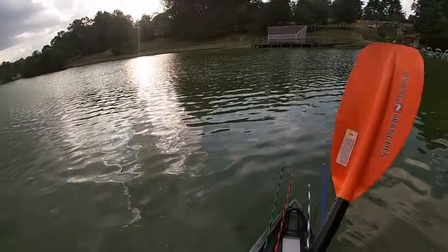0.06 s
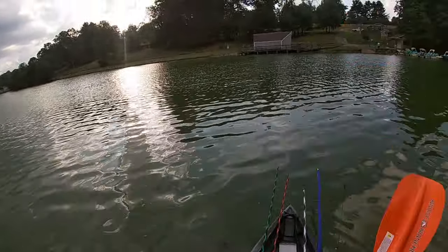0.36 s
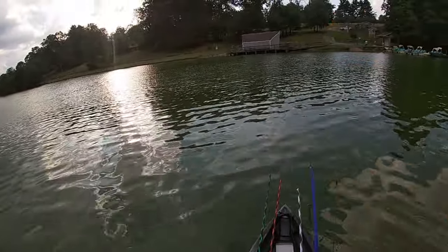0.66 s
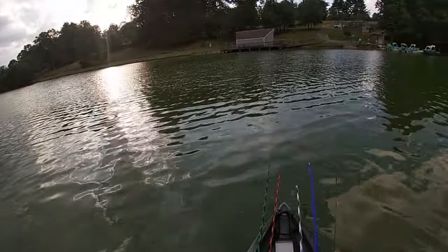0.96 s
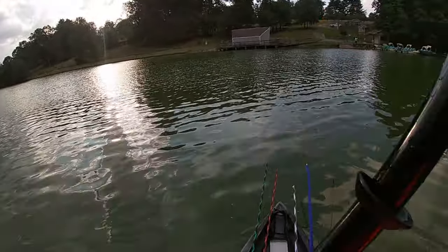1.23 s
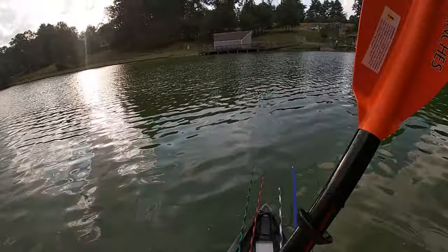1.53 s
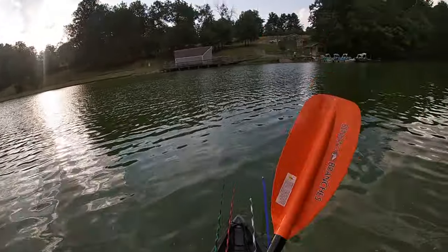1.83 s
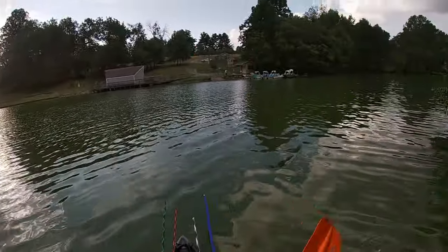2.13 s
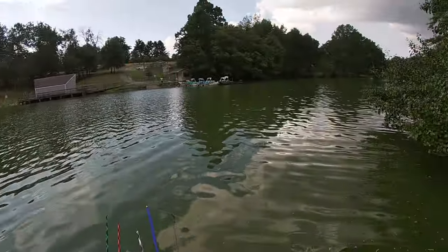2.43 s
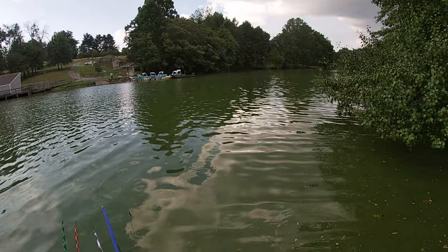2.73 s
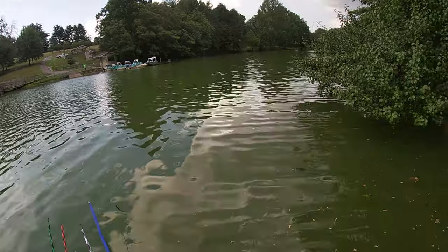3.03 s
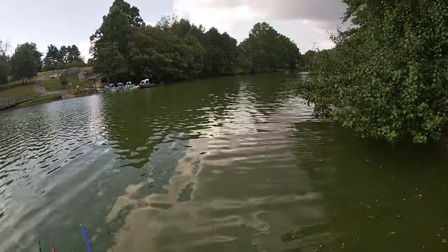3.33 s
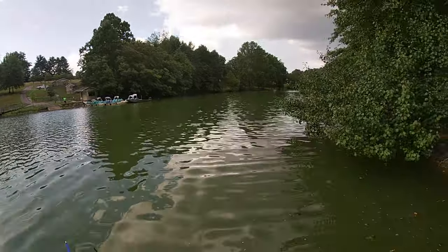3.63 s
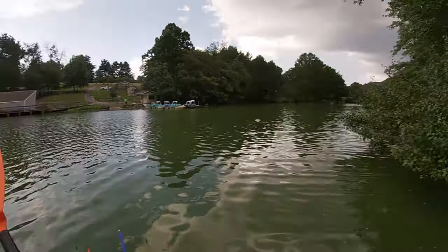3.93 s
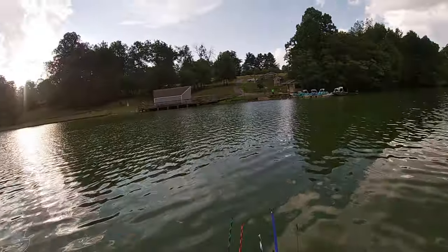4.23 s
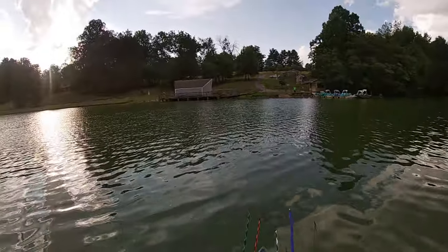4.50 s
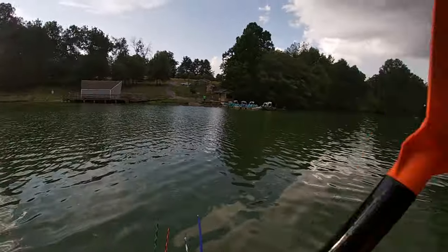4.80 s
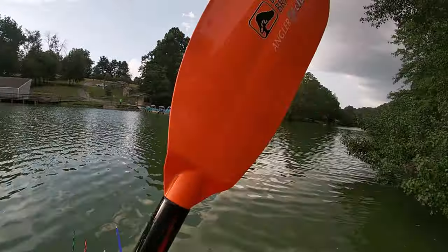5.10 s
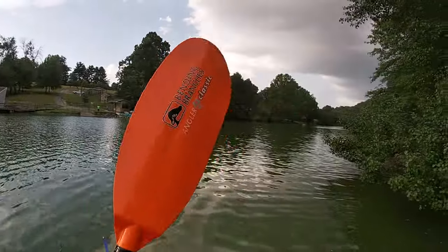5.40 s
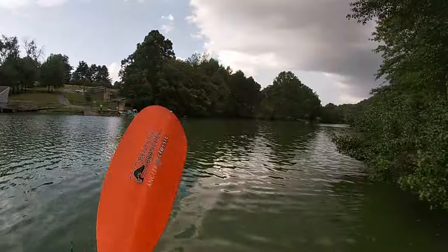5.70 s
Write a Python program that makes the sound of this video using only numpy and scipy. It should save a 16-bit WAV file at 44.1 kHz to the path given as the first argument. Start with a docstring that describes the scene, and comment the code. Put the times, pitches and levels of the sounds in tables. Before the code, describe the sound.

A kayak paddle dips, gurgles and drips in uneven strokes on a pond, with wind rumbling on the microphone.

```python
"""On a pond, close to a kayak paddled in uneven strokes: each blade plops in, churns up ringing
bubbles and drips as it is lifted. Wind buffets the microphone, which hears everything twice,
a few milliseconds apart, and so sounds hollow. Farther off, on the wooded bank, crickets trill
with their wings and small birds chip now and then over a hiss of leaves and insects."""
import sys
import numpy as np
from scipy import signal
from scipy.fft import rfft, irfft
from scipy.io import wavfile
from scipy.ndimage import uniform_filter1d

SR = 44100
rng = np.random.default_rng(int(sys.argv[2]) if len(sys.argv) > 2 else 0)


def unload_wav(signal):
    """Save mono or channel-first audio to the path in sys.argv[1] as 16-bit WAV at rate SR, clipped to [-1, 1]."""
    wavfile.write(
        sys.argv[1],
        SR,
        np.round(np.clip(np.atleast_2d(signal).T, -1, 1) * 32767).astype(np.int16),
    )


N = 262395
TIME = np.arange(N) / SR


# Pulls of the blade, close by: catch_s, attack_s, length_s, gurgle_db, slosh_db, spray_db
STROKES = [(0.0, 0.03, 0.38, -48.5, -52, -84), (0.489, 0.36, 0.2, -52.5, -50, -60),
           (2.052, 0.23, 0.25, -50, -47.5, -60.5), (3.663, 0.079, 0.074, -48, -46, -54),
           (3.879, 0.045, 0.079, -43.5, -45, -58), (4.105, 0.12, 0.032, -45, -53.5, -65),
           (5.796, 0.15, 0.17, -50.5, -55.5, -79.5)]

def stirring(levels_db, bed, lag_s, sag_db_per_s, release_db_per_s):
    """Bubble level in dB over a quiet bed: up at each catch, easing in the pull, settling after it."""
    power = bed ** 2
    for (catch_s, attack_s, length_s, *_), level_db in zip(STROKES, levels_db):
        t = TIME - catch_s - lag_s
        fall_db = sag_db_per_s * np.clip(t, 0, length_s) + release_db_per_s * np.maximum(t - length_s, 0)
        power += (ramp(catch_s + lag_s - attack_s, attack_s) * from_db(level_db - fall_db)) ** 2
    return 10 * np.log10(power)


# Large, middling and fine bubbles around the blade: pitch_hz, relative_db
GURGLE = [(125, 5), (180, -3.5), (260, -12.5), (380, 4), (520, -24)]
SLOSH = [(400, -16), (550, -5), (1000, -3.5), (1500, -2.5), (2200, -5.5), (3000, -7.5), (4000, -9.5)]
SPRAY = [(2800, 4), (4000, 0.5), (6000, 3), (8500, 0), (10000, -5.5), (11000, -21.5), (14000, -14)]

def churn(runoff_fade_s=0.27, clump_db=1.56):
    """The blade folds air into the water; between pulls, ripples lap the hull and the blade trickles."""
    *_, gurgles, sloshes, sprays = np.transpose(STROKES)
    lap = from_db(in_time(BACKGROUND_LEVEL))
    trickle = np.zeros(N)
    for start_s, length_s, trickle_db, _ in RUNOFFS:
        fade_in = ramp(start_s - runoff_fade_s, runoff_fade_s)
        fade_out = 1 - ramp(start_s + length_s, runoff_fade_s)
        trickle += from_db(trickle_db) * fade_in * fade_out
    gurgle_bed = np.hypot(from_db(-64.5) * lap, from_db(-6.5) * trickle)
    slosh_bed = np.hypot(from_db(-69) * lap, trickle)
    spray_bed = np.hypot(from_db(-77) * lap, from_db(-13) * trickle)
    gurgle_db = stirring(gurgles, gurgle_bed, lag_s=0.005, sag_db_per_s=1.3, release_db_per_s=89)
    slosh_db = stirring(sloshes, slosh_bed, lag_s=0.0013, sag_db_per_s=16.4, release_db_per_s=79)
    spray_db = stirring(sprays, spray_bed, lag_s=0.0034, sag_db_per_s=26.3, release_db_per_s=49)
    clumps_db = clump_db * wander(width_hz=27.2)   # tumbling water bunches the slosh and spray
    gurgle = bubble_cloud(GURGLE, gurgle_db, max_per_s=170, ring_cycles=17.8,
                          spread_db=2.5, rise=0.542, froth=0.37, thinning=0.18)
    slosh = bubble_cloud(SLOSH, slosh_db + clumps_db, max_per_s=1200, ring_cycles=28.1,
                         spread_db=2.5, rise=0.33, froth=0.63, thinning=0.26)
    spray = bubble_cloud(SPRAY, spray_db + clumps_db, max_per_s=3000, ring_cycles=28,
                         spread_db=6.5, rise=0.053, froth=1.0, thinning=0.19)
    return gurgle + slosh + spray


def bubble_cloud(sizes, level_db, max_per_s, ring_cycles, spread_db, rise, froth, thinning):
    """Random bubbles on a bed of fine froth; they come thicker as the water is stirred harder."""
    bubbles = np.zeros(N)
    low_hz, high_hz = sizes[0][0], min(sizes[-1][0], .4 * SR)
    density = from_db(thinning * (level_db - level_db.max()))
    for when, size, strength, life, side, luck in rng.random((int(max_per_s * N / SR), 6)):
        chance = density[int(when * N)]
        if luck < chance:
            hz = low_hz * (high_hz / low_hz) ** size
            gain = from_db(at_hz(sizes, hz) - spread_db * np.log(max(strength, .03))) / np.sqrt(chance)
            ring = bubble(hz, ring_cycles * (.5 + life) / hz, rise * 2 * life, onset_cycles=0.76)
            add(bubbles, when * N / SR, np.sign(side - .5) * gain * ring)
    fizz_spectrum = [(hz, db - 10 * np.log10(hz)) for hz, db in sizes]
    fizz = band(noise(fizz_spectrum), low_hz, high_hz, order=3)
    return from_db(level_db) * steady(rms_one(bubbles) + froth * rms_one(fizz), span_s=0.023)


def bubble(hz, t60_s, rise, onset_cycles, bend=None):
    """A trapped air pocket rings, rising in pitch as it nears the surface and bent by moving water."""
    t = np.arange(int(t60_s * SR) + 2) / SR
    onset = 1 - np.exp(-(t * hz / onset_cycles) ** 2)
    envelope = onset * from_db(-60 * t / t60_s)
    sway_s = 0 if bend is None else np.cumsum(np.resize(bend, len(t))) / SR
    cycles = hz * (t * (1 + rise * t / t60_s / 2) + sway_s)
    return envelope / (envelope.max() + 1e-12) * np.sin(2 * np.pi * cycles)


# The larger plops and drips beside the boat: start_s, pitch_hz, peak_db, t60_s
PLOPS = [(0.0148, 465, -30, 0.0077), (0.087, 1540, -44.5, 0.025), (0.3863, 570, -36, 0.021),
         (0.401, 1364, -37, 0.031), (0.67, 1075, -41.5, 0.024), (0.777, 730, -47.5, 0.04),
         (1.2157, 690, -45.5, 0.011), (1.217, 1850, -49, 0.019), (1.3001, 475, -31.5, 0.018),
         (1.437, 790, -57, 0.035), (1.4766, 530, -37, 0.023), (1.506, 990, -42, 0.023),
         (1.507, 1630, -43, 0.02), (1.537, 1110, -41.5, 0.026), (1.5587, 1810, -44.5, 0.022),
         (1.606, 517, -42.5, 0.017), (1.6168, 1020, -39, 0.019), (1.644, 297, -46, 0.13),
         (1.676, 2080, -54, 0.028), (1.697, 1250, -43, 0.022), (1.705, 404, -38, 0.28),
         (1.777, 1117, -37, 0.047), (1.806, 2040, -45, 0.041), (1.824, 3150, -49.5, 0.076),
         (1.867, 420, -39.5, 0.11), (1.9532, 2030, -44.5, 0.023), (1.96, 2850, -45.5, 0.031),
         (2.0436, 950, -34.5, 0.031), (2.067, 824, -34, 0.029), (2.094, 750, -39.5, 0.035),
         (2.1245, 740, -35.5, 0.075), (2.28, 970, -40.5, 0.041), (3.585, 990, -44.5, 0.022),
         (3.616, 1040, -45, 0.023), (3.6303, 1070, -20.5, 0.012), (3.6321, 2050, -28, 0.016),
         (3.6884, 1140, -27.5, 0.014), (3.743, 373, -34.5, 0.14), (3.775, 249, -40, 0.022),
         (3.7815, 1025, -32, 0.023), (3.824, 2590, -35.5, 0.022), (3.825, 790, -40.5, 0.017),
         (3.8865, 2340, -37, 0.015), (3.9304, 768, -35, 0.042), (4.016, 1070, -38, 0.025),
         (4.017, 568, -33.5, 0.025), (4.04, 1060, -43, 0.022), (4.466, 1080, -56.5, 0.017),
         (4.558, 264, -50, 0.054), (4.744, 1340, -55.5, 0.038), (4.988, 2250, -56, 0.025),
         (5.044, 1750, -53, 0.0089), (5.071, 1030, -51, 0.022), (5.125, 1850, -63, 0.018),
         (5.21, 1340, -54, 0.012), (5.233, 1580, -55, 0.014), (5.2807, 515, -42, 0.041),
         (5.305, 2090, -63, 0.028), (5.371, 2080, -55.5, 0.028), (5.3858, 1670, -51, 0.024),
         (5.454, 1880, -54, 0.022), (5.498, 1850, -61, 0.017), (5.523, 3950, -60, 0.022),
         (5.609, 2150, -58, 0.026), (5.613, 730, -65, 0.03), (5.6653, 824, -47, 0.024),
         (5.667, 2000, -52.5, 0.022), (5.697, 450, -36.5, 0.023), (5.707, 1090, -41.5, 0.025),
         (5.798, 990, -47, 0.024), (5.8757, 1530, -43.5, 0.025)]

def plops(splash_db=-9, wobble=0.056, shed_count=3, shed_db=-12, shed_s=0.033, shed_octaves=0.73):
    """A heavy drop or fold of water breaks the surface; its bubble wavers and sheds a few fainter ones."""
    out = np.zeros(N)
    unrest = wobble * wander(width_hz=250)
    for (start_s, hz, peak_db, t60_s), shed in zip(PLOPS, rng.random((len(PLOPS), shed_count, 2))):
        ring = bubble(hz, t60_s, rise=0.051, onset_cycles=0.36, bend=unrest[int(start_s * SR):])
        add(out, start_s, from_db(peak_db) * ring)
        add(out, start_s, from_db(peak_db + splash_db) * crack(1.54 * hz, t60_s=0.0046))
        for when, size in shed:
            shed_hz = hz * 2 ** (shed_octaves * (2 * size - .7))
            ring = bubble(shed_hz, t60_s / 2, rise=0.07, onset_cycles=0.43)
            add(out, start_s + when * shed_s, from_db(peak_db + shed_db) * (1 - when / 2) * ring)
    return out


# Air hollows beside the blade: start_s, length_s, start_hz, end_hz, level_db, roughness (0-1)
GULPS = [(1.343, 0.028, 945, 1510, -58, 0.2), (1.374, 0.028, 450, 573, -54, 0.4),
         (1.941, 0.075, 253, 269, -39, 0.46), (2.0377, 0.027, 250, 620, -23, 0.33),
         (2.107, 0.012, 1770, 3150, -40, 0.6), (2.277, 0.0237, 526, 885, -36.5, 0.76),
         (4.83, 0.027, 435, 850, -52, 0.42), (4.881, 0.06, 1575, 1700, -68.5, 0.3),
         (5.064, 0.05, 266, 335, -52.5, 0.37), (5.16, 0.13, 803, 758, -61.5, 0.9),
         (5.41, 0.12, 494.6, 540, -52, 0.87), (5.664, 0.0416, 401, 650, -45, 0.25),
         (5.705, 0.023, 830, 960, -48, 0.4), (5.706, 0.056, 368, 458, -38, 0.23),
         (5.757, 0.068, 447, 638, -43, 0.54), (5.803, 0.15, 511, 570, -43.5, 0.92),
         (5.839, 0.04, 774, 1560, -49, 0.6)]

def gulps():
    """The hollow behind a pulled blade rings, gliding as it changes size; tumbling water roughens it."""
    out = np.zeros(N)
    tumble = flutter(width_hz=208)
    for start_s, length_s, start_hz, end_hz, level_db, roughness in GULPS:
        progress = np.linspace(0, 1, int(length_s * SR))
        hz = start_hz * (end_hz / start_hz) ** (progress ** 1.86)
        envelope = np.sqrt(np.abs(np.sin(np.pi * progress ** 0.94))) * (1 - progress / 2)
        unrest = np.roll(tumble, -int(start_s * SR))[:len(progress)]
        drive = np.sqrt(1 - roughness ** 2) + roughness * unrest
        add(out, start_s, from_db(level_db) * envelope * np.imag(drive * phasor(hz)))
    return out


# Slaps on the water, close by: start_s, peak_db, band_hz
SLAPS = [(0.022, -39, 4400), (0.359, -38, 2070), (0.851, -48, 1490), (1.3, -38.5, 5050), (1.301, -56, 900),
         (1.302, -36.5, 1800), (1.463, -38.5, 1650), (1.475, -40.5, 2060), (1.774, -37.5, 815),
         (1.936, -40.5, 1100), (2.111, -33, 2480), (2.278, -47, 890), (3.558, -52, 4000),
         (3.574, -52, 5500), (3.6278, -32.5, 6240), (3.6305, -35, 810), (3.6312, -29.5, 1670),
         (3.781, -38, 4200), (3.782, -35.5, 1100), (3.824, -39, 1350), (3.876, -38.5, 880),
         (3.877, -48, 1800), (4.017, -34.5, 705), (4.129, -46, 5100), (4.159, -41, 1860),
         (5.442, -45.5, 2800), (5.51, -51.5, 4400)]

def slaps():
    """The blade or a drop hits the surface with a brief crack."""
    out = np.zeros(N)
    for start_s, peak_db, band_hz in SLAPS:
        add(out, start_s, from_db(peak_db) * crack(band_hz, t60_s=0.0077))
    return out


def crack(band_hz, t60_s):
    """The surface breaks in a burst of noise about an octave wide that dies at once; peak 1."""
    t = np.arange(N // 40) / SR
    burst = from_db(-60 * t / t60_s) * rng.standard_normal(len(t))
    burst = band(burst, band_hz / 1.53, band_hz * 1.17)
    return burst / np.abs(burst).max()


# Water running off the raised blade: start_s, length_s, trickle_db, loudest_drip_db
RUNOFFS = [(1.423, 0.53, -57.5, -44.5), (4.868, 0.8, -74, -59)]

def drips(per_s=82, range_db=13, low_hz=515, high_hz=2990):
    """Small drops fall at random while the blade is in the air, each ringing a bubble."""
    out = np.zeros(N)
    for start_s, length_s, _, loudest_db in RUNOFFS:
        for when, size, softness in rng.random((int(per_s * length_s), 3)):
            ring = bubble(low_hz * (high_hz / low_hz) ** size, t60_s=0.019, rise=0.28, onset_cycles=0.77)
            add(out, start_s + when * length_s, from_db(loudest_db - range_db * softness) * ring)
    return out


# Spurts of droplets from the raised blade: start_s, length_s, level_db
SPURTS = [(1.07, 0.034, -48), (1.297, 0.02, -50), (1.326, 0.56, -63)]

def spatter(per_s=2500, fade_db=14, range_db=10):
    """Fine droplets fly off the wet blade in soft spurts that die away."""
    clicks = np.zeros(N)
    for start_s, length_s, level_db in SPURTS:
        for when, softness, side in rng.random((int(per_s * length_s), 3)):
            click = np.sign(side - .5) * from_db([level_db - fade_db * when - range_db * softness])
            add(clicks, start_s + when * length_s, click)
    return band(clicks, low_hz=5000, high_hz=14500)


# Hard ticks, close by: start_s, level_db, t60_s
TICKS = [(0.049, -44.5, 0.045), (0.851, -47, 0.023), (2.728, -55, 0.039), (2.7554, -46.5, 0.03),
         (2.773, -43.5, 0.025), (4.228, -32, 0.0077), (4.2435, -36.5, 0.011)]
# The rings of one tick: pitch_hz, relative_db
TICK_MODES = [(2720, -4), (3020, -4), (3900, -14.5), (5500, -22)]

def ticks():
    """A small hard part, likely a loose joint in the paddle, clicks with the same few short rings."""
    out = np.zeros(N)
    for start_s, level_db, t60_s in TICKS:
        for hz, mode_db in TICK_MODES:
            ring = bubble(hz, t60_s, rise=0.012, onset_cycles=2.1)
            add(out, start_s, from_db(level_db + mode_db) * ring)
    return out


# The breeze right on the microphone: time_s, level_db
BREEZE = [(0.0, -35.5), (0.23, -37.5), (0.48, -39.5), (0.68, -40.5), (0.93, -37.5), (1.11, -35),
          (1.49, -48), (1.66, -52.5), (1.89, -40), (2.07, -32.5), (2.15, -36), (2.88, -44.5), (3.71, -39),
          (3.96, -27), (4.32, -42.5), (4.54, -43), (5.65, -42.5), (5.95, -37.5)]
# Short lulls and a few slight lifts in it: centre_s, half_length_s, change_db
LULLS = [(0.578, 0.038, -10), (0.73, 0.035, 1.5), (1.19, 0.05, -9.5), (2.51, 0.05, -3), (2.623, 0.014, -13),
         (2.956, 0.031, -16), (3.085, 0.025, 0.5), (3.327, 0.029, -6), (4.004, 0.1, -13),
         (4.615, 0.083, -6), (4.885, 0.033, -0.5), (5.784, 0.05, -4)]
# Gusts on top of it: centre_s, half_length_s, rumble_db, buffet_db
GUSTS = [(0.14, 0.12, -66, -39), (0.271, 0.035, -40, -36.5), (0.356, 0.013, -34, -40.5),
         (0.63, 0.02, -37, -60), (0.886, 0.018, -32.5, -37), (0.973, 0.019, -30.5, -35.5),
         (1.051, 0.012, -29.5, -39), (1.11, 0.033, -44, -56), (1.552, 0.1, -39, -81),
         (1.982, 0.048, -39.5, -37), (2.097, 0.035, -41, -39), (2.236, 0.019, -29.5, -33),
         (2.377, 0.007, -32, -47), (2.639, 0.027, -42, -37.5), (2.792, 0.017, -31.5, -59),
         (3.265, 0.016, -39.5, -60), (3.433, 0.019, -33, -65), (3.55, 0.034, -35, -68),
         (3.793, 0.05, -33.5, -33.5), (4.119, 0.015, -41.5, -31), (4.164, 0.029, -29.5, -30.5),
         (4.38, 0.051, -37, -52.5), (4.528, 0.027, -40.5, -49), (5.22, 0.023, -35, -48.5),
         (5.437, 0.032, -42.5, -47), (5.555, 0.034, -34.5, -51), (5.639, 0.022, -37, -43.5)]
# Spectra of the deep rumble and the higher buffeting: frequency_hz, density_db
RUMBLE = [(12, -24), (25, 3.5), (38, 2), (55, 1.5), (80, -6.5), (120, -11), (180, -26.5), (280, -43.5),
          (500, -41.5), (1000, -85)]
BUFFETING = [(40, -16.5), (70, -2.5), (120, 2.5), (170, -7.5), (260, -17.5), (400, -33), (2000, -100)]

def wind(lumpy_db=2.0):
    """Eddies rumble on the microphone port in lumps; gusts swell briefly and buffet it higher in pitch."""
    breeze_db = in_time(BREEZE) + lumpy_db * wander(width_hz=22.4)
    breeze_db += sum(change_db * hump(centre_s, half_s) for centre_s, half_s, change_db in LULLS)
    rumble_gain, buffet_gain = from_db(breeze_db - 2), from_db(breeze_db - 18)
    for centre_s, half_s, rumble_db, buffet_db in GUSTS:
        swell = hump(centre_s, half_s)
        rumble_gain = np.hypot(rumble_gain, from_db(rumble_db) * swell)
        buffet_gain = np.hypot(buffet_gain, from_db(buffet_db) * swell)
    rumble = rumble_gain * steady(noise(RUMBLE), span_s=0.05)
    buffeting = buffet_gain * steady(noise(BUFFETING), span_s=0.029)
    return rumble + buffeting


# Two crickets across the water: pitch_hz, wing_strokes_per_s, one_stroke_at_s
CRICKETS = [(8225, 21.6, 2.693), (7760, 19.4, 5.36)]
# How strongly they sing, one curve each: time_s, level_db
SONGS = [
    [(0, -76), (1.6, -88), (2.4, -68), (2.5, -72), (2.68, -63.5), (2.87, -64.5), (3.12, -69), (3.4, -75),
     (3.55, -66), (4.3, -65), (4.42, -70), (4.72, -80), (4.79, -71), (4.92, -71), (5.23, -69), (5.3, -101)],
    [(2.0, -106), (2.5, -80), (4.3, -67), (4.65, -91), (5.3, -76), (5.95, -83)],
]

def crickets(waver=0.006, uneven_db=1.5, stagger_s=0.002, direct=0.48, scattered=0.25):
    """Each wing stroke is one short, unsteady note, a little early or late and blurred by the leaves."""
    out = np.zeros(N)
    for (pitch_hz, per_s, stroke_s), song in zip(CRICKETS, SONGS):
        late_s = stagger_s * wander(width_hz=9)
        strokes = np.maximum(np.cos(2 * np.pi * per_s * (TIME - stroke_s - late_s)), 0)
        hz = pitch_hz * (1 + waver * noise_band(5.5, 200))
        level_db = in_time(song) + uneven_db * wander(width_hz=12)
        paths = direct + scattered * flutter(width_hz=130)
        out += from_db(level_db) * strokes * np.imag(paths * phasor(hz))
    return out


# Chips from the trees: centre_s, half_length_s, pitch_hz, glide_hz_per_s, level_db, blur_hz
BIRD_CHIPS = [(2.888, 0.027, 8500, -3500, -69, 150), (2.932, 0.033, 7930, -14000, -65, 350),
              (5.268, 0.023, 3800, 3509, -66.5, 150), (5.597, 0.02, 3800, 4504, -66, 250)]

def birds():
    """Small birds give thin gliding chips, blurred by the trees."""
    out = np.zeros(N)
    for centre_s, half_s, pitch_hz, glide_hz_per_s, level_db, blur_hz in BIRD_CHIPS:
        t = TIME - centre_s
        whistle = np.exp(2j * np.pi * t * (pitch_hz + glide_hz_per_s * t / 2))
        out += from_db(level_db) * hump(centre_s, half_s) * np.real(flutter(blur_hz) * whistle)
    return out


# Far insects: centre_hz, width_hz, level_db
CHORUS = [(6290, 530, -75), (7240, 220, -93), (7710, 900, -81.5)]
# Spectrum of the soft hiss from the bank: frequency_hz, density_db
BANK_HISS = [(150, 18), (500, -16), (1300, -3), (2500, -10), (5000, -10.5), (8000, -11), (11000, -47.5)]
# Level of the bank and the lapping, dipping briefly after the hardest stroke: time_s, relative_db
BACKGROUND_LEVEL = [(0, 1), (2.5, 1.5), (2.9, -2), (3.1, -0.5), (3.5, 1.5), (4.4, -3.5), (4.65, -8),
                    (5.0, -2.5), (5.95, 2.5)]

def bank(hiss_db=-69.5):
    """Leaves and a chorus of far insects blend into a soft hiss with shrill bands."""
    chorus = sum(from_db(db) * noise_band(hz - width / 2, hz + width / 2) for hz, width, db in CHORUS)
    return from_db(in_time(BACKGROUND_LEVEL)) * (chorus + from_db(hiss_db) * noise(BANK_HISS))


def from_db(db):
    """Decibels to gain."""
    return 10 ** (np.asarray(db) / 20)


def rms_one(x):
    """Scale to unit power."""
    return x / np.sqrt(np.mean(x ** 2) + 1e-20)


def in_time(curve):
    """Read a curve at every sample."""
    return np.interp(TIME, *np.transpose(curve))


def at_hz(spectrum, hz):
    """Read a spectrum on a log-frequency axis."""
    points_hz, db = np.transpose(spectrum)
    return np.interp(np.log(np.maximum(hz, 1)), np.log(points_hz), db)


def ramp(start_s, length_s):
    """An even rise from 0 to 1."""
    return np.clip((TIME - start_s) / length_s, 0, 1)


def hump(centre_s, half_s):
    """A bell-shaped swell, peak 1."""
    return np.exp(-((TIME - centre_s) / half_s) ** 2)


def phasor(hz):
    """A complex tone that follows a pitch curve."""
    return np.exp(2j * np.pi * np.cumsum(hz) / SR)


def noise(spectrum):
    """Noise of the given colour, rms 1."""
    hz = np.arange(N // 2 + 1) * SR / N
    return rms_one(irfft(rfft(rng.standard_normal(N)) * from_db(at_hz(spectrum, hz)), N))


def noise_band(low_hz, high_hz):
    """Band-passed noise, rms 1."""
    return rms_one(band(rng.standard_normal(N), low_hz, high_hz))


def flutter(width_hz):
    """Complex noise that changes about width_hz times a second, rms 1."""
    hz = np.fft.fftfreq(N, 1 / SR)
    white = rng.standard_normal(N) + 1j * rng.standard_normal(N)
    smooth = np.fft.ifft(white * np.exp(-(hz / width_hz) ** 2))
    return smooth / np.std(smooth)


def wander(width_hz):
    """Real-valued flutter, rms 1."""
    return rms_one(flutter(width_hz).real)


def band(x, low_hz, high_hz, order=2):
    """Band-pass."""
    edges_hz = [low_hz, min(high_hz, .45 * SR)]
    return signal.sosfilt(signal.butter(order, edges_hz, "band", fs=SR, output="sos"), x)


def steady(x, span_s):
    """Even out swells slower than the span; rms about 1."""
    size = int(span_s * SR)
    power = uniform_filter1d(uniform_filter1d(x ** 2, size), size)
    return x / np.sqrt(np.abs(power) + 0.0011 * np.mean(x ** 2))


def add(out, start_s, sound):
    """Mix a short sound in at start_s."""
    i = int(np.clip(start_s * SR, 0, N - 1))
    out[i:i + len(sound)] += sound[:N - i]


def scene():
    """The paddle close by, wind on the microphone, the bank beyond; mono."""
    paddle = churn() + spatter() + plops() + drips() + gulps() + slaps() + ticks()
    return (paddle + wind() + bank() + crickets() + birds())[None]


def record(dry, fade_in_s=0.004, echo_s=0.003773, echo_gain=0.72, cutoff_hz=16200):
    """At the microphone one short echo combs the whole sound hollow; the top treble is cut."""
    dry = dry * np.minimum(TIME / fade_in_s, 1)
    hollow = dry + echo_gain * np.interp(TIME - echo_s, TIME, dry[0])
    return signal.sosfilt(signal.cheby2(12, 70, cutoff_hz, fs=SR, output="sos"), hollow)


dry = scene()
out = record(dry)
unload_wav(out)
```